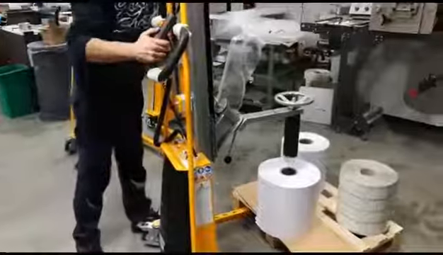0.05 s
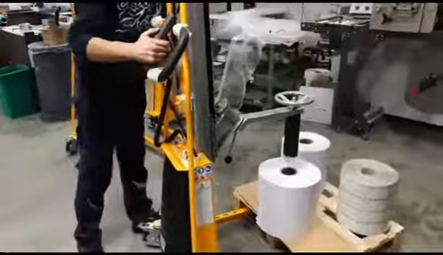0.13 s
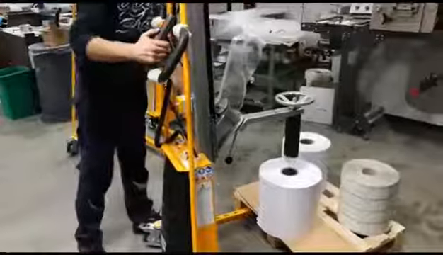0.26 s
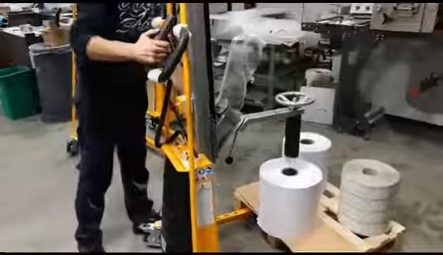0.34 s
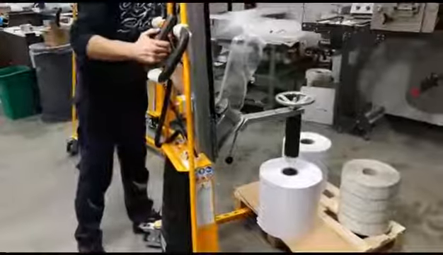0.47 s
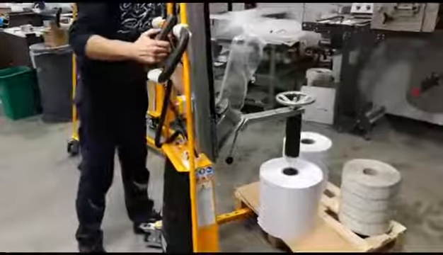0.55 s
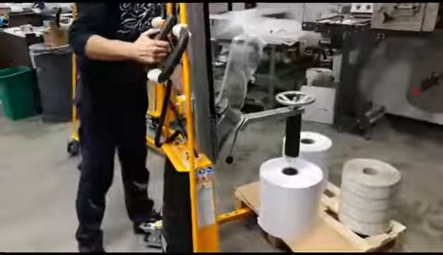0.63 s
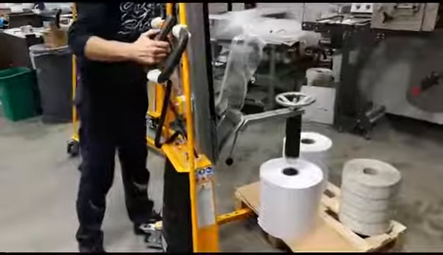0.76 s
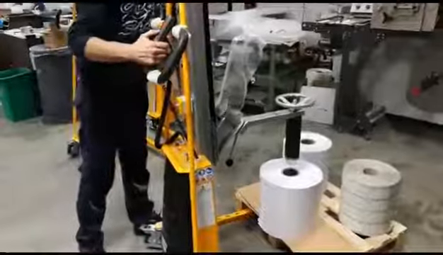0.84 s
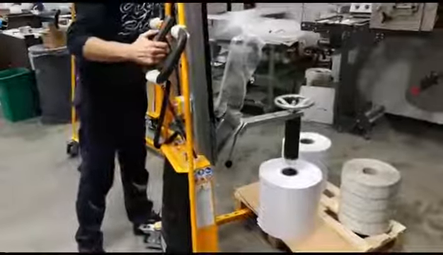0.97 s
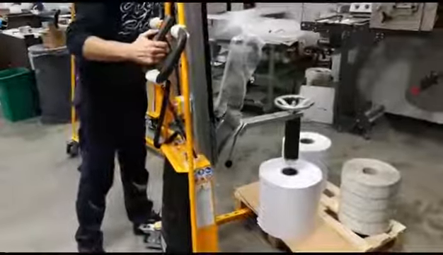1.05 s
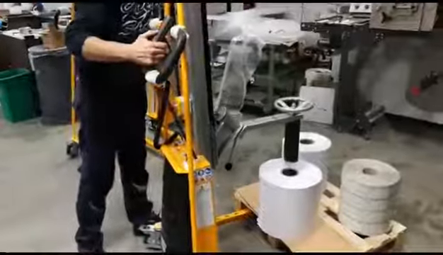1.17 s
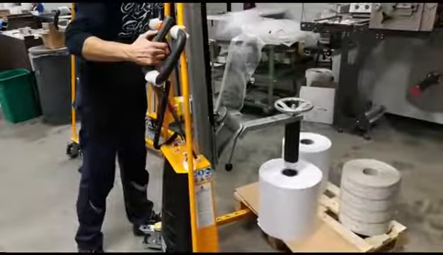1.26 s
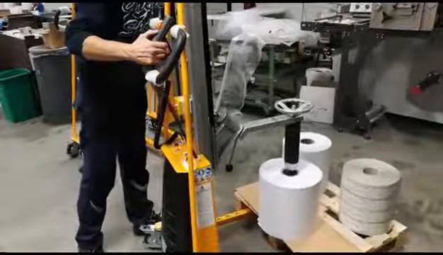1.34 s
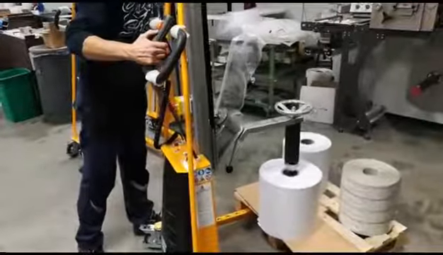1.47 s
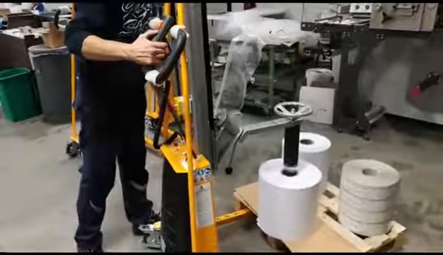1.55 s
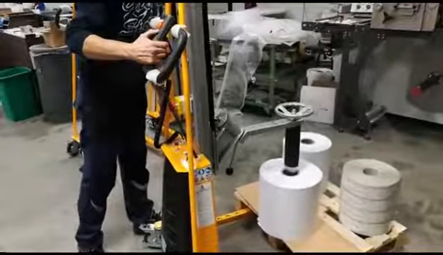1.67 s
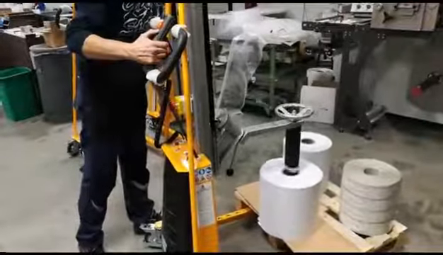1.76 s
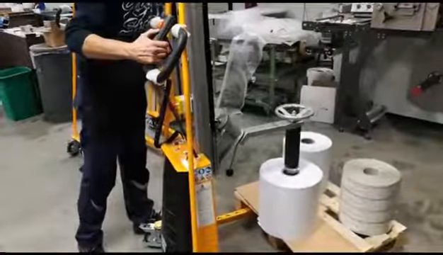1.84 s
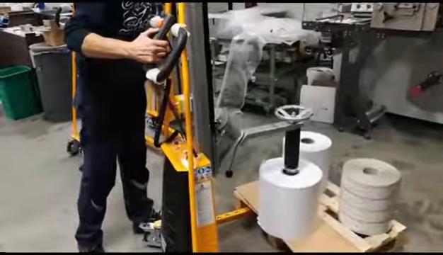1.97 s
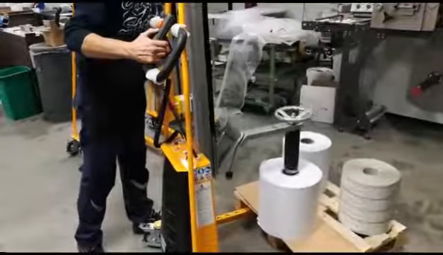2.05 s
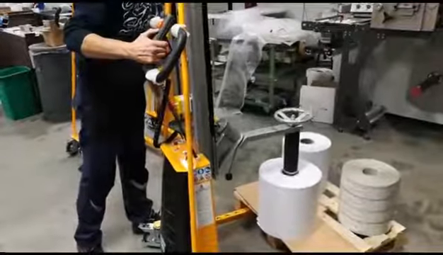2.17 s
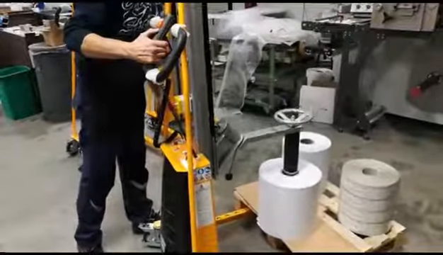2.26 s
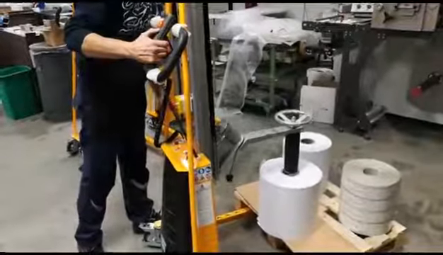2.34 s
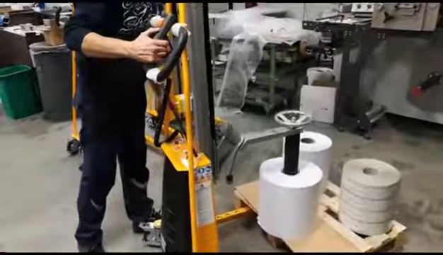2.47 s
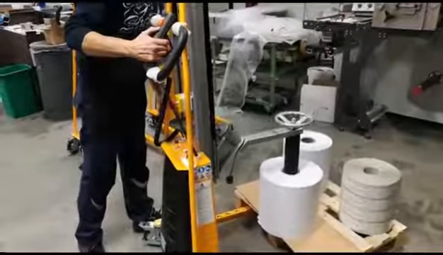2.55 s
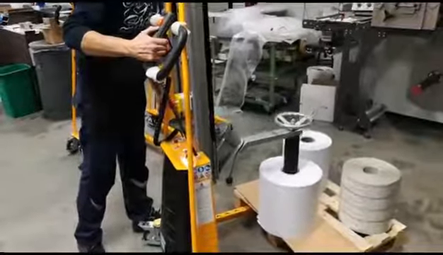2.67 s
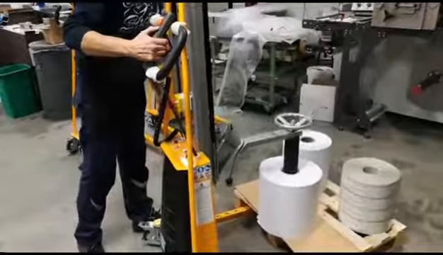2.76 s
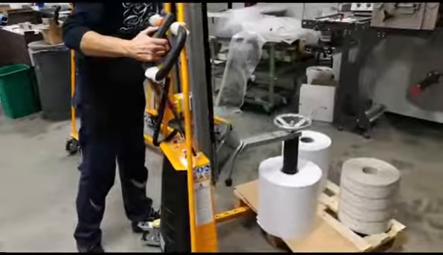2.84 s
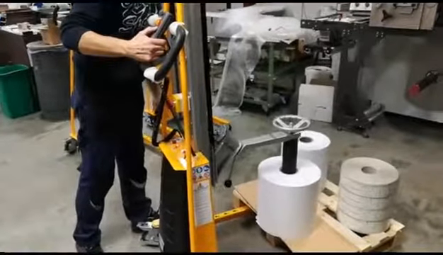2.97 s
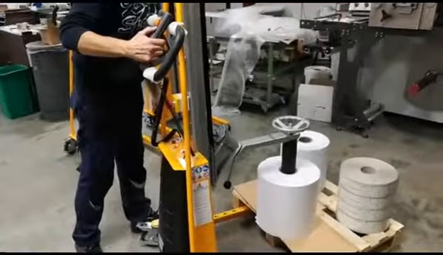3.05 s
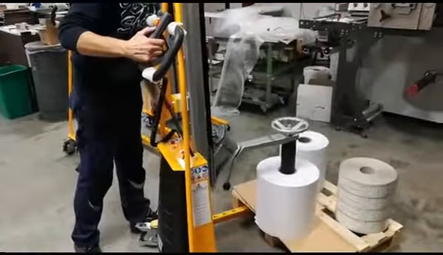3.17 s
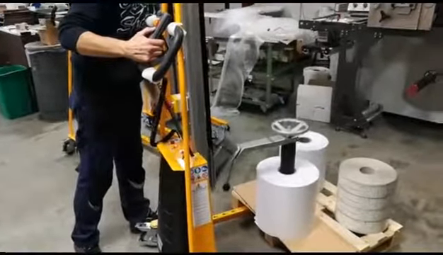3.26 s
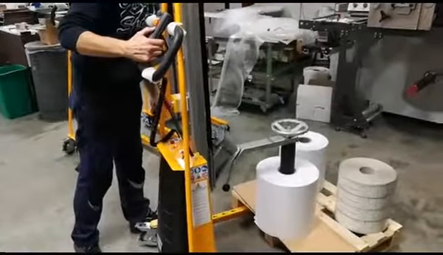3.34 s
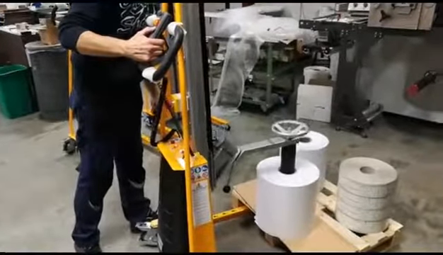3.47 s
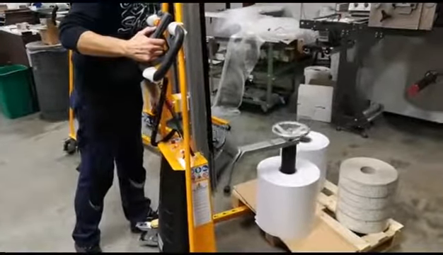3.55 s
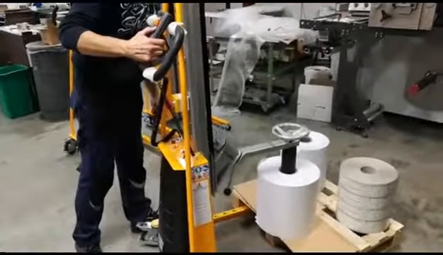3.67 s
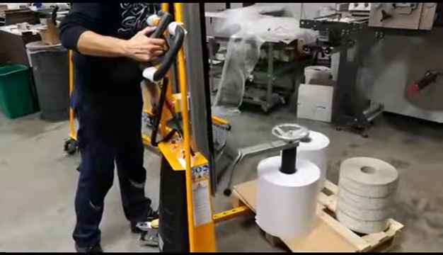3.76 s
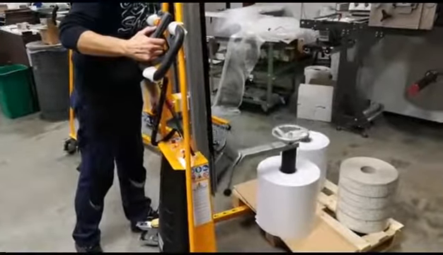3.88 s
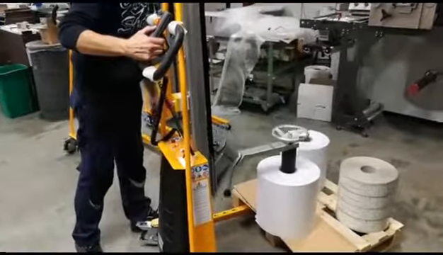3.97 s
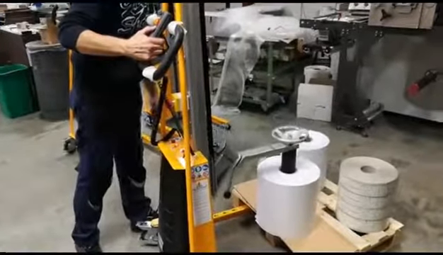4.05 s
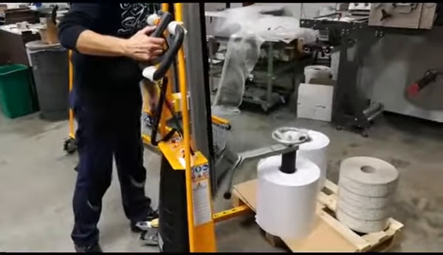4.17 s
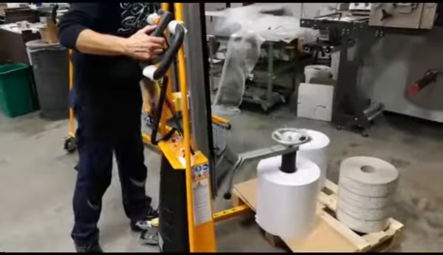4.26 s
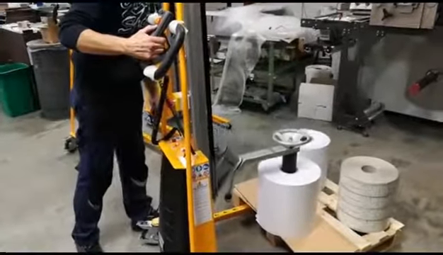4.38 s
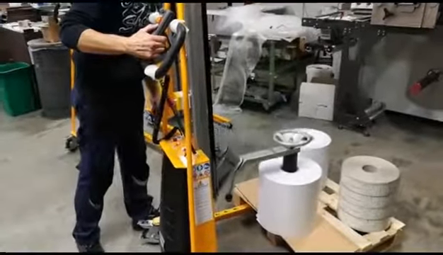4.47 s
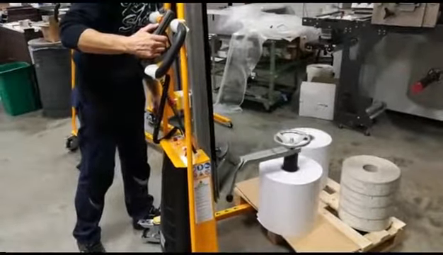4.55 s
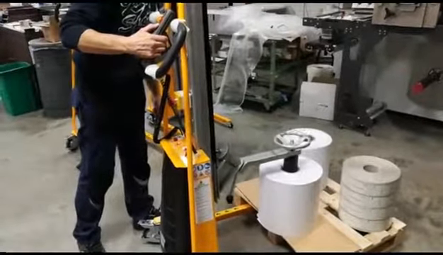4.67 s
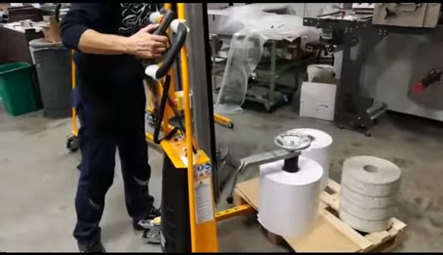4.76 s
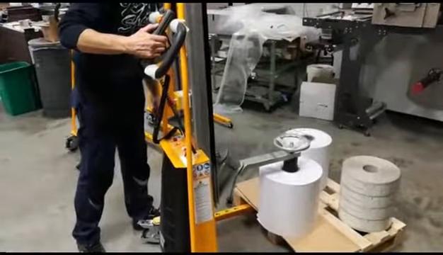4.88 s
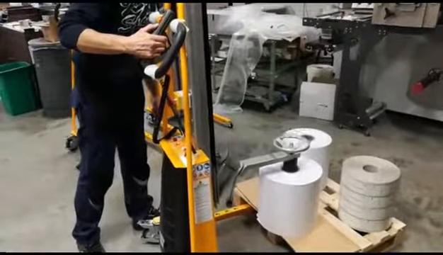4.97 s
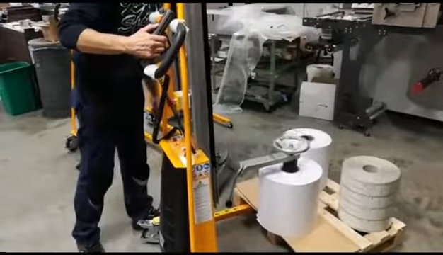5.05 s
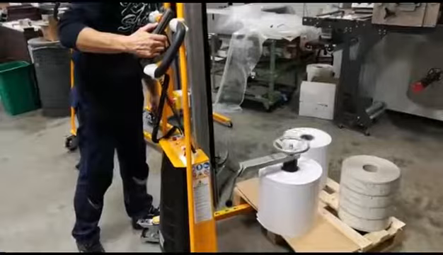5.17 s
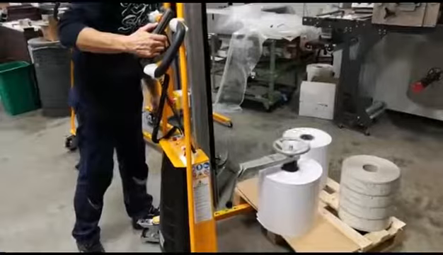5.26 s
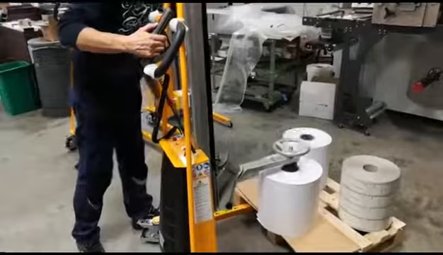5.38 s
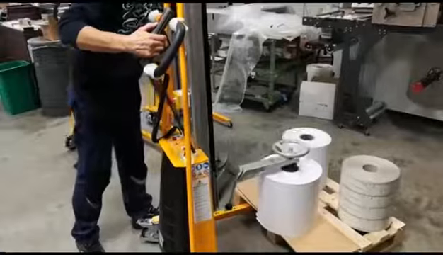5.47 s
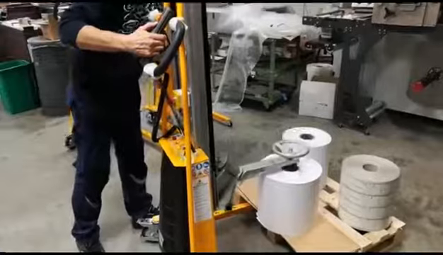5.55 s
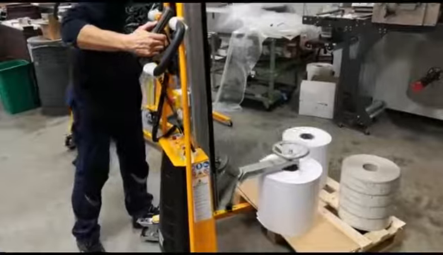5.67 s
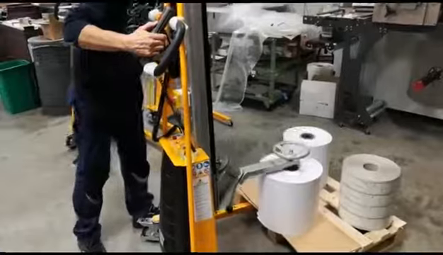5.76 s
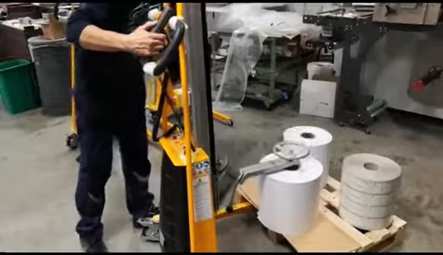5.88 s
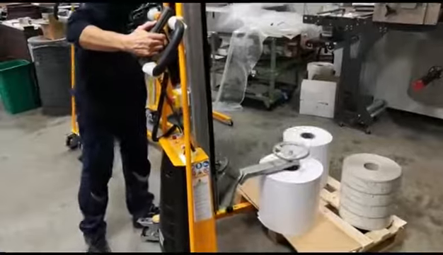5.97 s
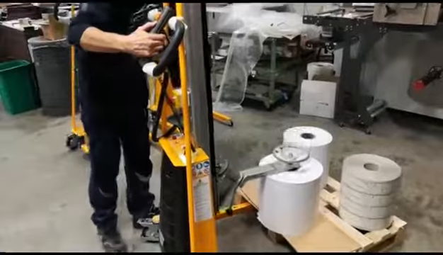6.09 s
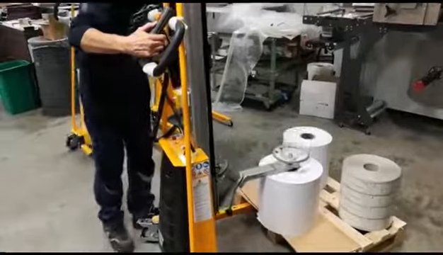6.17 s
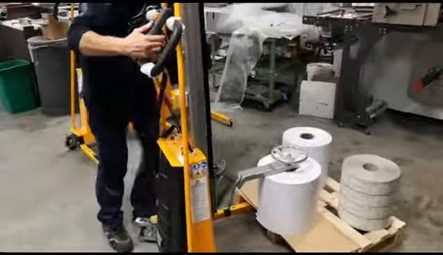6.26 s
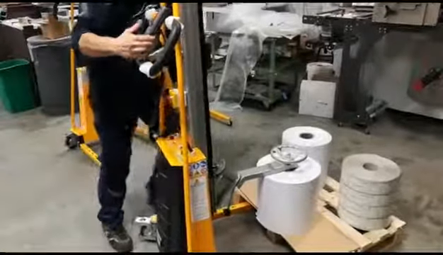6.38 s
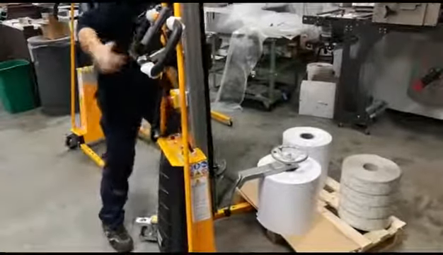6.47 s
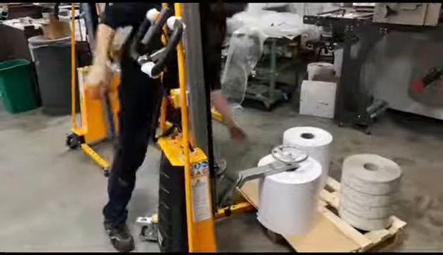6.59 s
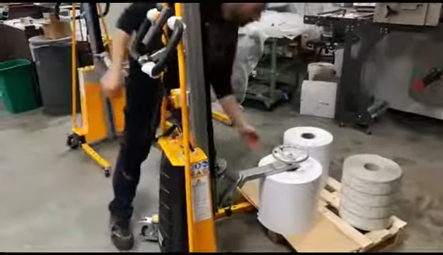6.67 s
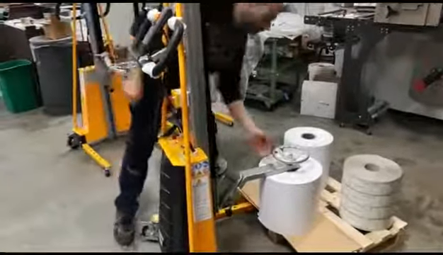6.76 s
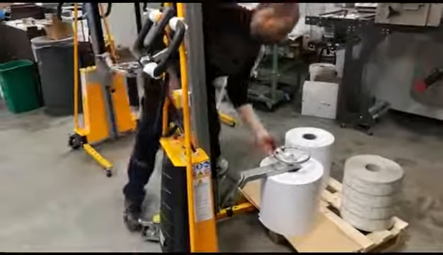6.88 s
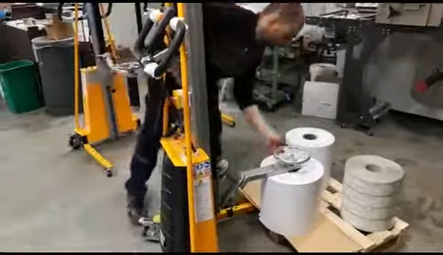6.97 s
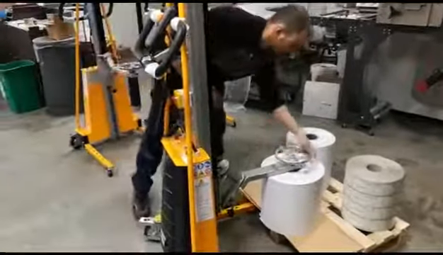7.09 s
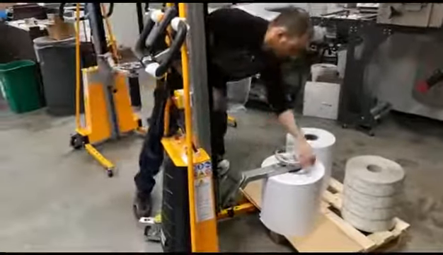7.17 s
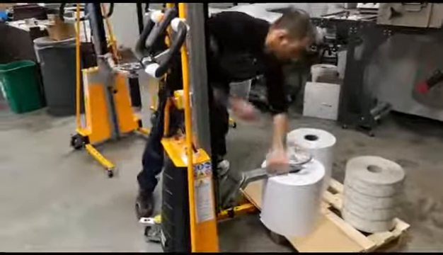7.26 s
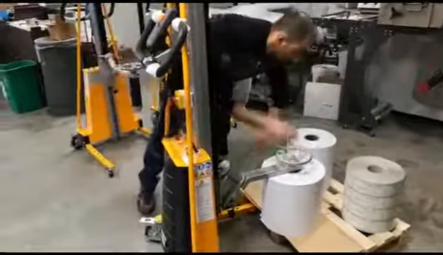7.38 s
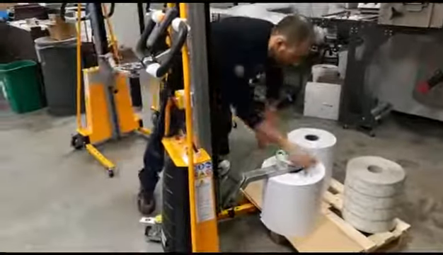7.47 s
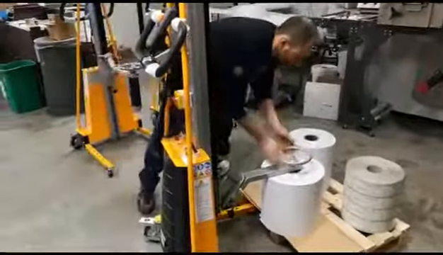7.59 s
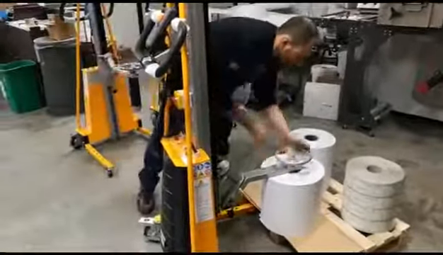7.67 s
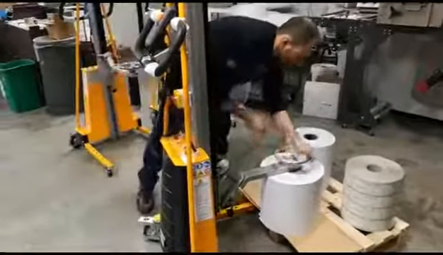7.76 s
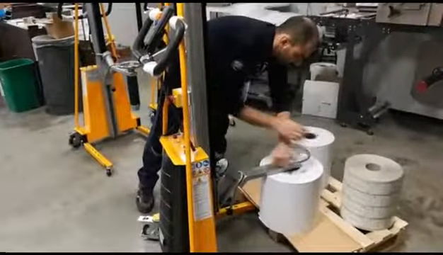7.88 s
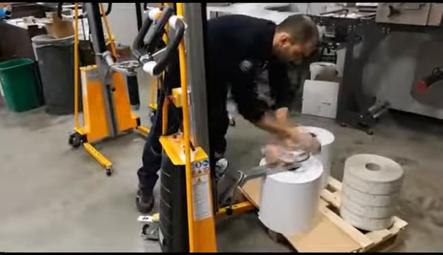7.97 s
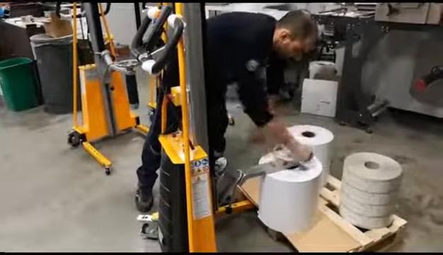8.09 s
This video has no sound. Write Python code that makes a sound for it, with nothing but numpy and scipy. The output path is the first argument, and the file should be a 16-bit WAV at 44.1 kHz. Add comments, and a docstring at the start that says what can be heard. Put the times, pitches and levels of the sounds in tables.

```python
"""Electric reel lifter in a workshop

A lifter heard from two metres by a phone's two ports. The brake snaps, the motor lowers the clamp with a
gear whine (sines locked to the shaft over resonant noise) and chain ticks, the arm knocks onto the paper roll
and bounces, then the clamp wheel is spun by hand until it clacks (struck modes and noise). Scraping, creaks
and squeals are shaped noise; a distant hum throbs under the room tone.
"""
import sys
import numpy as np
from scipy import signal
from scipy.fft import rfft, irfft, next_fast_len
from scipy.io import wavfile
from scipy.ndimage import uniform_filter1d

SR = 44100
rng = np.random.default_rng(int(sys.argv[2]) if len(sys.argv) > 2 else 0)


def dump_mix(stems):
    """Bounce the given channels to the path in sys.argv[1] as a 16-bit WAV at rate SR."""
    frames = np.atleast_2d(stems).T  # one column per channel
    limited = np.clip(frames, -1, 1)  # hard clip at full scale
    pcm = np.round(limited * 32767).astype(np.int16)
    wavfile.write(sys.argv[1], SR, pcm)


N = 358500
T = np.arange(N) / SR
PORT_LAG_S = 6 / SR  # sound reaches the left port first

# Chain ticks: (time [s], ring level [dB], thud re ring [dB], crack re ring [dB], left minus right [dB],
# gain of the ring above the split [dB])
CHAIN_TICKS = [(3.373, -39.5, -5, -25, -1, -33), (3.837, -65.5, -13.5, -33, -1.5, -28),
               (4.016, -32, -16, -41.5, 0, -23), (4.419, -32, -19, -30, 0, -32),
               (4.437, -44, -20, -28, -2, -35), (4.46, -35.5, 9, -31, 1, -5), (4.577, -35, 4, -34, -5, -25),
               (4.615, -31.5, -1, -40, 2, -4), (4.636, -37, -1, -38.5, 4, -27),
               (5.123, -29.5, -11, -39, -1, -21), (5.134, -44, -9.5, -38, 1, -25),
               (5.327, -37, -8.5, -40, -10, -13), (5.413, -38, -15, -40, -5, -4),
               (5.476, -31.5, -6, -30, -2, -30), (5.490, -33.5, -3, -39.5, 1, -35),
               (5.561, -35.5, -26.5, -32, -7, 3), (5.583, -40.5, -24, -33, -1, 2),
               (5.645, -46.5, -22, -39, -17, -12.5), (5.683, -38.5, -11.5, -33, 3.5, 4),
               (5.695, -34, -19, -36, -4, 2), (5.705, -36, -19, -35, -3, 1),
               (5.727, -33.5, -16.5, -35, -1, -2), (5.777, -31.5, 1, -33, -3, -26)]


def undb(db):
    """Decibels to amplitude."""
    return 10 ** (np.asarray(db) / 20)


def unit(x):
    """Scale to rms 1."""
    return x / np.sqrt(np.mean(x ** 2))


def left_right(pan_db):
    """A level difference in dB, half on each port."""
    return np.array([[pan_db], [-pan_db]]) / 2


def curves(table, off=None):
    """Columns over time; off outside the table."""
    s, *columns = np.transpose(table)
    return [np.interp(T, s, c, off, off) for c in columns]


def across(table, hz):
    """A (frequency, value) table read on a log-frequency axis."""
    f, v = np.transpose(table)
    return np.interp(np.log(np.maximum(hz, 1)), np.log(f), v)


def walk(rate):
    """Random levels held 1 / rate s and slewed twice; spread near 1."""
    k = int(SR / rate)
    steps = np.repeat(rng.standard_normal(N // k + 1), k)
    return 1.354 * uniform_filter1d(uniform_filter1d(steps, k), k)[:N]


def swell(s, spread, db):
    """A bell-shaped rise and fall."""
    return undb(db) * np.exp(-.5 * ((T - s) / spread) ** 2)


def stroke(s, rise, hold, t60):
    """Rise, hold, then die away."""
    fade = 1000. ** (-np.maximum(T - s - rise - hold, 0) / t60)
    return np.clip((T - s) / rise, 0, 1) ** 2 * fade


def pair(like, size=N):
    """Noise at both ports: a shared part that reaches the left first, and a diffuse part."""
    lag, like = int(PORT_LAG_S * SR + .5), np.clip(like, 0, 1)
    shared = rng.standard_normal(size + 20)
    direct = np.array([shared[lag:lag + size], shared[:size]])
    return np.sqrt(like) * direct + np.sqrt(1 - like) * rng.standard_normal((2, size))


def band(x, hz, width):
    """One resonance."""
    return signal.lfilter(*signal.iirpeak(hz, hz / width, SR), x)


def band_twice(x, hz, width):
    """The same resonance twice, for steeper skirts."""
    return band(band(x, hz, width), hz, width)


def resonant(x, peaks, flicker_db, rate, swell_db=0):
    """Noise in steep resonances, each flickering and swelling alone; rms 1."""
    out = 0
    for hz, width, db in peaks:
        wander_db = flicker_db * walk(rate)
        if swell_db:
            wander_db = wander_db + swell_db * walk(rate / 6)
        out = out + undb(db + wander_db) * unit(band_twice(x, hz, 0.689 * width))  # narrowed, being doubled
    return unit(out)


def room():
    """Half-octave bands of workshop noise that swell together and flicker alone, under a throbbing hum."""
    # Spectrum of the room tone: (frequency [Hz], relative density [dB per Hz])
    room_spectrum = [(15, -38), (25, -4), (65, -11.5), (108, -12.5), (186, -7), (401, -26.5), (1490, -24.5),
                     (1810, -27.5), (2410, -38.5), (3140, -25.5), (3710, -31), (3980, -24.5), (5310, -48),
                     (6430, -36), (7600, -44.5), (9880, -62), (16700, -120)]
    # Swells at the hum's pitch: (strongest at [s], spread [s], level [dB]); those at 6.25 s and 6.47 s come
    # with the arm's knocks
    throbs = [(0.719, 0.017, -61), (1.45, 0.026, -60.5), (1.92, 0.056, -66), (2.28, 0.032, -59),
              (2.45, 0.097, -57), (2.917, 0.059, -57.5), (3.17, .05, -62), (3.55, 0.065, -55),
              (3.82, 0.088, -65.5), (4.05, 0.037, -57), (4.26, 0.042, -55), (4.56, 0.047, -52.5),
              (4.83, 0.042, -60), (4.99, 0.0255, -54), (5.41, 0.075, -60.5), (5.79, 0.072, -57.5),
              (6.25, 0.035, -49), (6.471, 0.0324, -52), (6.92, 0.055, -58), (7.6, 0.066, -58.5),
              (8.09, 0.038, -57.5)]
    room_db, hum_hz, hum_db = -61.5, 61.6, -71  # room rms; centre pitch and level of the hum between swells
    tone, slow = 0, walk(1.0)
    for hz in 28 * 2 ** np.arange(0, 8.3, .5):
        db = across(room_spectrum, hz) + 10 * np.log10(hz) + slow + 2.2 * walk(9)
        tone = tone + undb(db) * unit(band_twice(pair(0.38), hz, hz / 2))
    hum = np.sqrt(2) * np.sin(2 * np.pi * np.cumsum(hum_hz + 3.5 * walk(12)) / SR)
    hum_level = undb(hum_db + 1.9 * walk(6.9)) + sum(swell(*row) for row in throbs)
    return unit(tone) * undb(room_db) + hum * hum_level


def rubbing():
    """Metal grinds in uneven grains while parts slide, and the frame hums with it."""
    # Arm landing and settling, then the wheel in its thread: (start [s], rise [s], hold [s], t60 [s],
    # low level [dB], middle level [dB], treble level [dB])
    rubs = [(6.15, 0.0524, 0.04, 0.11, -30, -30.5, -42.5), (6.238, 0.013, 0.076, 0.44, -37, -43, -50.5),
            (6.391, 0.028, 0.044, 0.85, -52.5, -55.5, -90), (6.603, 0.0135, 0.087, 0.12, -53, -62, -89),
            (6.763, 0.011, 0.018, 0.132, -51.5, -90, -95), (7.211, 0.039, 0.047, 0.14, -46, -60, -92),
            (7.317, 0.0346, 0.04, 0.62, -63, -59, -88), (7.772, 0.0068, 0.025, 0.438, -41, -43.5, -75),
            (7.893, 0.03, 0.094, 0.33, -59, -64, -72.5), (8.03, 0.024, .1, .2, -55, -55.5, -76)]
    # Frame resonances: (frequency [Hz], nominal width [Hz], level [dB])
    frame = [(135.5, 19, -1.5), (159.27, 20, 6), (178.2, 23, 2), (258, 93, 0.5)]
    # Scraping resonances: (frequency [Hz], nominal width [Hz], level [dB])
    scrape = [(587, 830, 3), (1007, 1000, 0), (1584, 670, -3.5), (2565, 680, -8), (2940, 924, 1)]
    low, middle, treble = sum(np.outer(undb(row[4:]), stroke(*row[:4])) for row in rubs)
    grains = undb(2 * walk(60)) * pair(.4)
    out = low * resonant(pair(0.85), frame, 1.5, 16)
    out += middle * resonant(grains, scrape, 0.71, 9.9)
    return out + treble * resonant(grains, [(4300, 1000, -3), (5550, 900, 0)], 2, 42)


def creaks():
    """The load creaks on the carriage: uneven slips ring a few narrow resonances of the clamp."""
    # Creaks: (start [s], rise [s], hold [s], t60 [s], level [dB])
    creak_times = [(3.36, .004, 0.013, .06, -66), (4.012, .005, .02, 0.087, -59.5),
                   (4.456, .004, .03, .1, -57), (4.607, .004, 0.022, .12, -51),
                   (5.558, .006, .015, .08, -67), (5.68, .012, 0.033, 0.14, -51.5),
                   (5.747, .01, 0.067, .08, -62)]
    # Clamp resonances: (frequency [Hz], nominal width [Hz], level [dB])
    clamp = [(2035, 65, -6), (2330, 60, -4), (2600, 94, -5), (2740, 110, 0), (3210, 70, -8)]
    slips = undb(4.0 * walk(200)) * pair(.6)
    level = sum(undb(row[4]) * stroke(*row[:4]) for row in creak_times)
    return level * resonant(slips, clamp, 2.8, 25)


def squeals():
    """Brief squeals, pings, hums and hisses: gliding tones whose noisy wander sets their width."""
    # (start [s], length [s], first frequency [Hz], last frequency [Hz], width [Hz], mid level [dB])
    squeal_rows = [(0, 0.3, 6850, 6560, 2100, -76.5), (0.05, 0.51, 3270, 3370, 160, -77.5),
                   (0.352, 0.047, 3110, 3040, 80, -64.5), (0.706, 0.042, 7050, 7400, 340, -64),
                   (0.884, 0.12, 2875, 2950, 160, -56.5), (0.9, 0.14, 3555, 3545, 91, -62),
                   (1.0, 0.091, 3600, 3900, 100, -71.5), (1.296, 0.189, 3350, 3400, 84, -54.5),
                   (1.451, 0.31, 3305, 3340, 92, -62.5), (6.21, 0.067, 3792, 3790, 53, -41.5),
                   (6.188, 0.049, 155, 150, 18, -31.5), (6.233, 0.047, 156, 141.6, 19, -34),
                   (6.24, 0.0093, 1220, 1240, 71, -22.5), (6.28, 0.13, 142.2, 137.8, 16, -37),
                   (6.409, 0.16, 137.6, 138, 13, -44), (6.397, 0.052, 6430, 6460, 1900, -57),
                   (6.589, 0.048, 3778, 4060, 740, -62.5), (6.594, .16, 166.3, 170, 10.6, -45),
                   (6.636, 0.089, 5280, 5100, 970, -69), (7.24, 0.13, 3230, 3270, 250, -69.5),
                   (7.378, 0.046, 670, 650, 56, -58.5), (7.708, .035, 666, 636, 46, -43),
                   (7.79, .06, 151, 158.5, 18, -37), (7.847, 0.0225, 3280, 3370, 80, -59.5),
                   (7.948, 0.1037, 273, 256, 72, -51.5), (7.984, 0.3, 3370, 3350, 140, -65.5)]
    steady = .4  # steady tone against wander
    tail, fade_db = .3, 5  # share of the length spent dying away; fall from start to end
    out = np.zeros((2, N + SR))
    for s, length, hz0, hz1, width, db in squeal_rows:
        i, n = int(s * SR), int(length * SR)
        sway = uniform_filter1d(rng.standard_normal((2, n)), int(SR / width))  # in-phase and quadrature
        phase = 2 * np.pi * np.cumsum(np.linspace(hz0, hz1, n)) / SR
        tone = (sway[0] + steady * sway.std()) * np.cos(phase) + sway[1] * np.sin(phase)
        ends = np.hanning(n) ** 0.17 * np.clip(np.linspace(1 / tail, 0, n), 0, 1)
        slope = undb(-fade_db * np.linspace(-.5, .5, n))
        out[:, i:i + n] += undb(db) * ends * slope * unit(tone)
    return out[:, :N]


def ring(modes, t, longest):
    """Modes struck together, slightly mistuned, heard first at the left port; peak 1."""
    out = 0
    lag = PORT_LAG_S * np.array([[1], [0]])
    for hz, db, t60 in modes:
        u = rng.standard_normal(4)
        phase = 2 * np.pi * hz * ((1 + 0.004 * u[0]) * t + lag) + .5 * u[1:3, None]
        out = out + undb(db + 1.5 * u[3]) * np.sin(phase) * 1000 ** (-t / min(t60, longest))
    return out / np.abs(out).max()


def blows(table, modes, longest, push_s, early_db, hall_db, low_db, top_db, split_hz):
    """Each blow: ringing metal, a thud in the frame, a crack, a short clatter and the hall's answer by band."""
    # Mast and pallet modes: (frequency [Hz], level [dB], t60 before the cap [s])
    mast_pallet = [(135.5, -2, 0.27), (155, 4.5, 0.34), (180.6, -3.5, 0.84), (237.9, -1.5, 0.66),
                   (283, -33, 0.12)]
    # Decay of the hall: (frequency [Hz], t60 [s])
    hall_t60 = [(500, 0.79), (1000, 0.28), (2000, 0.26), (4000, 0.26), (7000, 0.46)]
    size = SR // 2
    out, t = np.zeros((2, N + size)), np.arange(size) / SR
    rise = 1 - np.exp(-t / push_s)  # the contact takes time
    soft, hard = (signal.butter(4, split_hz, kind, fs=SR, output="sos") for kind in ("low", "high"))
    bands = 400 * 2 ** np.arange(0, 4.3, .6)
    clatter_fade = undb(early_db) * 1000 ** (-t / .045)
    fades = [undb(hall_db) * 1000 ** (-t / across(hall_t60, hz)) + clatter_fade for hz in bands]
    crack_fade = 1000 ** (-t / .025) + .08 * 1000 ** (-t / .25)
    for s, db, thud_db, crack_db, pan_db, upper_db in table:
        thud = undb(thud_db) * ring(mast_pallet, t, 2 * longest) * (1 - np.exp(-t / 0.013))
        noise = pair(0.021, size=size)
        crack = undb(crack_db) * band_twice(noise, 7100, 2600) * crack_fade
        body = ring(modes, t, longest)
        for hz, fade in zip(bands, fades):
            tilt_db = np.interp(np.log2(hz / 1300), [-2, 0, 3], [low_db, 0, top_db])
            body += undb(tilt_db) * unit(band_twice(noise, hz, hz / 2)) * fade
        dull = signal.sosfilt(soft, rise * body)
        bright = undb(upper_db) * signal.sosfilt(hard, rise * body)  # hard contact is bright
        i = int(s * SR)
        out[:, i:i + size] += (dull + bright + rise * crack + thud) * undb(db + left_right(pan_db))
    return out[:, :N]


def chain_ticks():
    """Links tick and ring the carriage very briefly."""
    # Carriage modes: (frequency [Hz], level [dB], t60 before the cap [s])
    carriage = [(626, -1.5, 0.12), (990, -25, 0.063), (1144, 8.5, 0.075), (1264, 6, 0.045),
                (1312, -2.5, 0.045), (1980, -9, 0.04), (2350, -8, .03), (2550, 2, 0.04), (2950, 3, .03)]
    return blows(CHAIN_TICKS, carriage, longest=.06, push_s=.0006, early_db=-24, hall_db=-21.0,
                 low_db=-31.0, top_db=-26.5, split_hz=2040)


def latch():
    """The latch releases and rings."""
    # Releases: (time [s], ring level [dB], thud re ring [dB], crack re ring [dB], left minus right [dB],
    # gain of the ring above the split [dB])
    releases = [(6.597, -34, -9, -38, -0.5, -9), (6.637, -39.5, -18, -40, -0.046, -6),
                (6.7, -44, -23, -40, 0, -13.5)]
    # Latch modes: (frequency [Hz], level [dB], t60 before the cap [s])
    latch_modes = [(753, -3, 0.18), (910, 0.5, 0.13), (983, 4, .1), (1420, -2, .2), (1580, -4.5, 0.24),
                   (1730, -3, 0.121), (2250, -13, .06)]
    return blows(releases, latch_modes, longest=.25, push_s=.0008, early_db=-8.0, hall_db=-17.0,
                 low_db=-28.0, top_db=-30.0, split_hz=2000)


def wheel():
    """The clamp wheel clacks: short, hard contacts."""
    # Clacks: (time [s], ring level [dB], thud re ring [dB], crack re ring [dB], left minus right [dB],
    # gain of the ring above the split [dB])
    clacks = [(7.214, -49, -21, -29, -8.5, -19), (7.25, -58, -8, -28, -9.5, -15),
              (7.711, -27.5, -8, -39, -5, -30.5), (7.722, -28.5, -11, -36, 4.5, -31),
              (7.766, -17, -15, -56, -1.5, -2), (7.789, -35, -1, -38.5, 12.5, -25),
              (7.896, -37, -12, -39.5, 0.5, -4), (8.032, -44, -21, -38, -3, -23)]
    # Wheel modes: (frequency [Hz], level [dB], t60 before the cap [s])
    wheel_modes = [(628, 5.5, 0.049), (540, -4.5, 0.21), (741, -2, .2), (816, 5, 0.11), (1108, -3, 0.044),
                   (1290, 8, 0.035), (1610, -14, 0.087), (1760, -2.5, .05), (2020, 3, 0.07),
                   (2300, -11, 0.087), (2446, 0, 0.04), (2870, -18, 0.097), (3220, -3, 0.07),
                   (4000, -14, .04)]
    return blows(clacks, wheel_modes, longest=0.24, push_s=0.00021, early_db=-8.5, hall_db=-20.0,
                 low_db=-12.0, top_db=-24.5, split_hz=2700)


def arm():
    """The arm knocks onto the paper roll and bounces: slow, soft contacts."""
    # Knocks: (time [s], ring level [dB], thud re ring [dB], crack re ring [dB], left minus right [dB],
    # gain of the ring above the split [dB])
    knocks = [(6.137, -58.5, 4.5, -38, -3, -9.5), (6.186, -27, 4.5, -46, -6.5, 3),
              (6.201, -28.5, -5, -32.5, -10, -3.5), (6.216, -25, 2, -38, 0.5, 12),
              (6.241, -25.5, 5, -40.5, -6, -9), (6.269, -34.5, -1, -39.5, 3, -8),
              (6.296, -39, 0.5, -41, 0.5, -2), (6.321, -39, 3, -30, 4.5, -6),
              (6.348, -45.5, -1, -40, 1, -5), (6.372, -38.5, 5, -45.5, 3.5, -13),
              (6.429, -41, 5, -37, -4.5, -4)]
    # Arm modes: (frequency [Hz], level [dB], t60 before the cap [s])
    arm_modes = [(414, 4, .25), (477, 1.5, 0.3), (780, -4, 0.34), (1233, 3.5, 0.25), (1374, 2, 0.3),
                 (1500, -11, .15), (1890, -4, .1), (2600, -24, 0.08), (3050, -11, 0.11), (3350, 4, 0.11),
                 (5700, 2, .05)]
    return blows(knocks, arm_modes, longest=0.22, push_s=0.0035, early_db=-0.5, hall_db=-18.0,
                 low_db=-3.1, top_db=-22.5, split_hz=2250)


def brake():
    """The brake snaps: very short contacts and the longest ring."""
    # Snaps: (time [s], ring level [dB], thud re ring [dB], crack re ring [dB], left minus right [dB],
    # gain of the ring above the split [dB])
    snaps = [(0.644, -10, -24.5, -12, 0, -3.5), (0.854, -41, -29, 20.5, 0.5, -14),
             (6.24, -24.5, -32, -30, 2, 0.5)]
    # Brake modes: (frequency [Hz], level [dB], t60 before the cap [s])
    brake_modes = [(619, -18, 0.4), (930, -16.5, 0.18), (1150, -0.5, 0.19), (1220, -4, 0.38),
                   (1270, -1.5, 0.092), (1390, -0.5, 0.11), (1400, -6.5, .2), (1526, -6.5, .08),
                   (1670, -1, 0.094), (1863, -6, 0.17), (2370, -5, 0.042), (2460, -20, 0.13),
                   (2850, -12, .08), (3100, -10, 0.14), (4050, -16, .06), (5340, -1, 0.054),
                   (7050, -11.5, 0.025)]
    return blows(snaps, brake_modes, longest=0.7, push_s=0.00017, early_db=-14.5, hall_db=-13.5,
                 low_db=-37, top_db=-29.0, split_hz=2600)


def whine(ports):
    """Sines at multiples of the shaft speed and the tooth-mesh rate, each wavering in phase and level."""
    # Shaft orders: multiples of the shaft speed
    shaft_orders = [8, 9, 11, 12, 17, 22, 23, 24, 25, 26, 28, 29, 35, 48, 60, 61, 72, 85, 91, 93, 95, 96,
                    105, 107, 108, 119, 120, 125, 132]
    # One row for each shaft order: (level [dB], left minus right [dB])
    order_levels = [(-71, 9), (-78, 3), (-84.5, -14.5), (-58.5, 6.5), (-74, 9.5), (-63.5, -2), (-68, -1.5),
                    (-79, -4.5), (-74, -2), (-68, -2), (-69.5, -4.5), (-69.5, -2.5), (-83, -19),
                    (-77.5, 1.5), (-77, -13), (-79, -3), (-85, -4.5), (-82, 6), (-85.5, 6.5), (-82.5, 5.5),
                    (-83, 7), (-78.5, -5), (-82.5, 1), (-80, 2), (-85.5, -4.5), (-86, 4), (-79, 3),
                    (-86, 11.5), (-83, 11.5)]
    # Mesh orders: multiples of the mesh rate
    mesh_orders = [4, 5, 7]
    # Level of each mesh order [dB]
    mesh_levels = [-69, -65, -80.5]
    # Gain of all lines, which settle once the motor is up to speed: (time [s], level [dB])
    line_gain = [(.85, -10), (1.15, 0), (1.5, 0), (6.05, 2.5), (6.2, 3), (6.3, -20)]
    gear_ratio = 3.59  # tooth-mesh rate over shaft speed
    waver_turns = 0.0025  # the shaft twists to and fro, so high lines blur
    lines = [(k, *row) for k, row in zip(shaft_orders, order_levels)]
    lines += [(k * gear_ratio, db, 3.0) for k, db in zip(mesh_orders, mesh_levels)]
    out = 0
    for k, db, pan_db in lines:
        turned = k * (ports + waver_turns * walk(14)) + rng.random()
        wave = np.sqrt(2) * np.sin(2 * np.pi * turned)
        flutter_db = (1.6 + 3.5 * min(k / 50, 1)) * walk(4 + k / 6)  # high orders flutter more
        drift_db = .8 * walk(1.5)
        out = out + wave * undb(db + flutter_db + drift_db + left_right(pan_db))
    return out * undb(curves(line_gain)[0])


def mast_songs(ports):
    """The mast sings with single shaft orders while the carriage passes certain heights."""
    # (multiple of shaft speed, strongest at [s], spread [s], level [dB])
    songs = [(3, 0.99, 0.022, -49.5), (3, 1.8, 0.35, -60), (3, 2.48, 0.51, -56.5), (3, 3.54, 0.5, -48.5),
             (3, 4.1, 0.26, -54), (3, 5.84, 0.4, -52), (4, 0.97, 0.04, -57), (4, 3.2, 0.25, -72.5),
             (4, 4.43, 0.97, -59), (5, 1.2, 0.03, -62), (5, 3.065, 0.15, -61.5), (5, 4.0, .25, -63),
             (5, 4.753, 0.34, -57.5), (20, 1.58, 0.71, -54.5), (20, 3.02, 0.13, -54.5),
             (20, 3.957, 0.669, -52.5), (20, 5.5, .6, -52.5), (21, 2.1, 0.38, -57.5)]
    out = 0
    for k in (3, 4, 5, 20, 21):
        song = sum(swell(*row[1:]) for row in songs if round(row[0]) == k)
        flicker = undb(min(.2 * k, 1.5) * walk(12))
        out = out + np.sqrt(2) * np.sin(2 * np.pi * k * ports) * song * flicker
    return out


def running_noise(turns, run_s):
    """Gear and slide noise throb with the shaft; mast rumble and brush hiss do not; ticks stir all but brush."""
    # Gear resonances: (frequency [Hz], nominal width [Hz], level [dB])
    gear_peaks = [(430, 66, -2), (514.5, 220, 3.5), (612.5, 190, -0.5), (862.8, 140, -1.5),
                  (1023.5, 210, 4), (1076.4, 95, 3), (1224, 277.5, 7), (1400, 470, -8), (1400, 74, -15.5)]
    # Mast resonances: (frequency [Hz], nominal width [Hz], level [dB])
    mast_peaks = [(140.5, 16, -4.5), (150.7, 46, 2.5), (192.8, 77, 6), (245.4, 72, 1)]
    # Slide resonances: (frequency [Hz], nominal width [Hz], level [dB])
    slide_peaks = [(1894, 100, -3.5), (2070, 160, -9.5), (2536, 150, -5.5), (2840, 190, 1.5),
                   (3032, 300, 6.5), (3280, 150, 3), (3684, 100, -0.5), (3770, 170, -4)]
    # Brush resonances: (frequency [Hz], nominal width [Hz], level [dB])
    brush_peaks = [(4600, 660, -8.5), (4800, 980, 8), (5110, 470, 10.5), (5600, 770, 12.5),
                   (5953, 700, 11.5), (6395, 310, 9.5), (6635, 1200, 11.5), (7020, 360, 3.5),
                   (7215, 390, 2.5)]
    # Mast rumble: (time [s], level [dB])
    rumble = [(.88, -61), (.99, -48.5), (1.25, -62), (1.5, -62), (2.3, -55), (3.7, -55), (4.5, -51.5),
              (5.5, -56.5), (5.85, -52.5), (6.2, -55.5)]
    stir_db, stir_s = (-17, -30.5, -44), 0.01  # gear, mast and slide re tick; hold time
    ticking = sum(undb(row[1]) * stroke(row[0], 0.011, stir_s, 3 * stir_s) for row in CHAIN_TICKS)
    stir = np.outer(undb(stir_db), ticking)
    # levels drift in dB per second as the carriage descends
    gear = undb(-52 + 1 * run_s) + stir[0]
    mast = undb(curves(rumble)[0]) + stir[1]
    slide = undb(-61 - 0.2 * run_s + 0.56 * walk(6.8)) + stir[2]
    brush = undb(-65 + 0.88 * run_s)
    throb = 1 + .5 * np.cos(4 * np.pi * turns) + 0.073 * np.cos(16 * np.pi * turns)  # 2 and 8 per turn
    grain = undb(1.5 * walk(70))  # unevenness of the gear noise
    out = gear * resonant(throb * grain * pair(0.16), gear_peaks, 1.0, 9)
    out = out + mast * resonant(pair(0.876), mast_peaks, 0.94, 5.4)
    out = out + slide * resonant(throb * pair(0.4), slide_peaks, 3.5, 30, 2.5)
    return out + brush * resonant(pair(0.072), brush_peaks, 1.8, 18)


def motor():
    """One turning shaft drives whine, mast songs and noise through switch-on, run and coast."""
    # Shaft speed before its small wander: (time [s], speed [Hz])
    shaft_speed = [(0, 53.12), (4.2, 53.1), (5.7, 53.02), (6.1, 52.8), (6.5, 52)]
    # Switch on, run, coast: (time [s], level [dB])
    power = [(.845, -6), (.87, 0.5), (6.2, -2.5), (6.42, -0.5), (6.5, -6), (6.56, -48.5)]
    # The housing radiates little here: (frequency [Hz], width [Hz])
    housing_dip = (4080, 450)
    turns = np.cumsum(curves(shaft_speed)[0] * (1 + 0.00036 * walk(6))) / SR
    ports = turns + shaft_speed[0][1] * PORT_LAG_S * np.array([[1], [0]])
    out = whine(ports) + mast_songs(ports) + running_noise(turns, T - power[0][0])
    for _ in range(2):
        out = out - band(out, *housing_dip)
    return out * undb(curves(power, -99)[0])


def scene():
    """Everything in the workshop, from the room tone to the lifter."""
    hits = chain_ticks() + latch() + wheel() + arm() + brake()
    return room() + rubbing() + creaks() + squeals() + hits + motor()


def record(dry):
    """The phone's ports: the right is duller, the bass is narrowed to the centre, the top is cut."""
    # The right port is shaded; half goes to each side: (frequency [Hz], right minus left [dB])
    right_shade = [(300, 0), (2500, 0), (4700, -5.5), (7500, -8)]
    mono_hz, top_hz = 277, 7500  # narrow below, cut above
    size = next_fast_len(N)
    hz = np.arange(size // 2 + 1) * SR / size
    left, right = rfft(dry, size) * undb(np.outer([-.5, .5], across(right_shade, hz)))
    width = np.maximum(.2, 1 / np.sqrt(1 + (mono_hz / np.maximum(hz, 1)) ** 6))
    side = (left - right) / 2 * width
    wet = irfft((left + right) / 2 + np.array([side, -side]), size)[:, :N]
    return signal.sosfilt(signal.ellip(12, .3, 66, top_hz, fs=SR, output="sos"), wet)


dry = scene()
out = record(dry)
dump_mix(out)
```